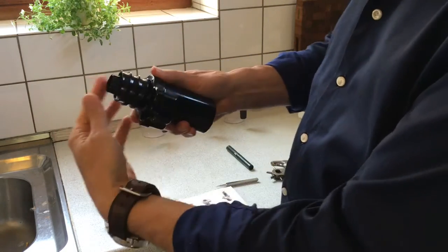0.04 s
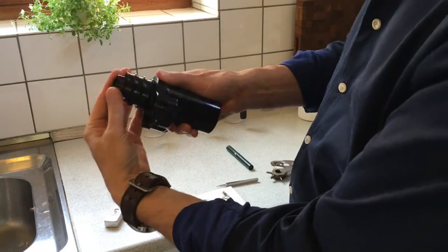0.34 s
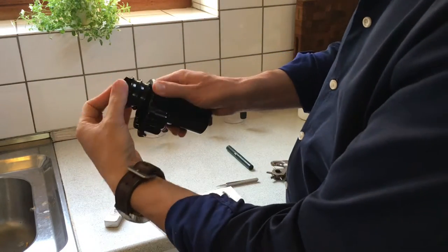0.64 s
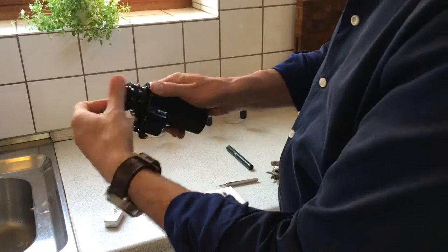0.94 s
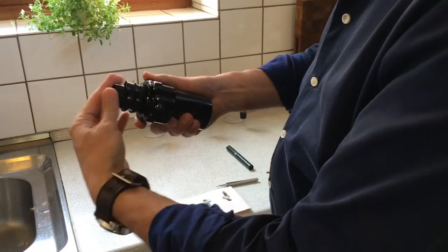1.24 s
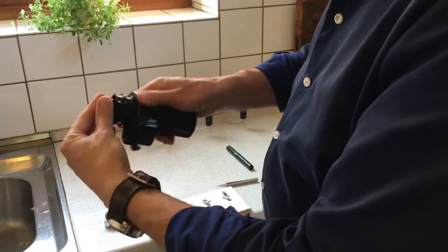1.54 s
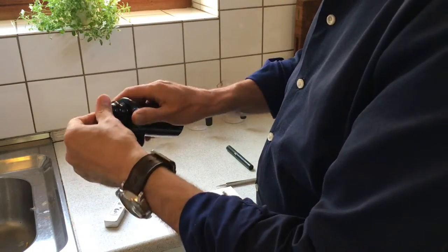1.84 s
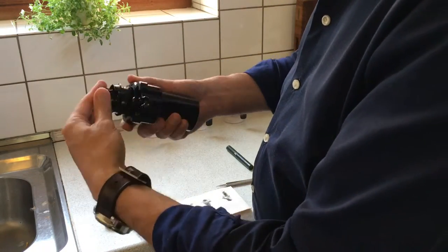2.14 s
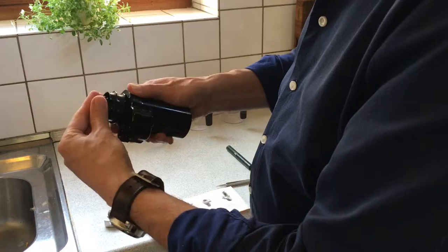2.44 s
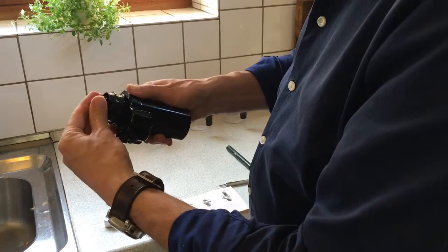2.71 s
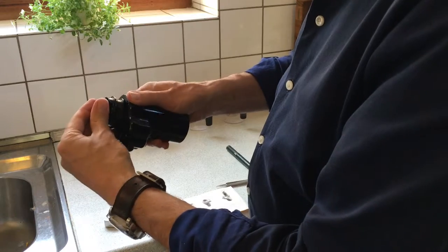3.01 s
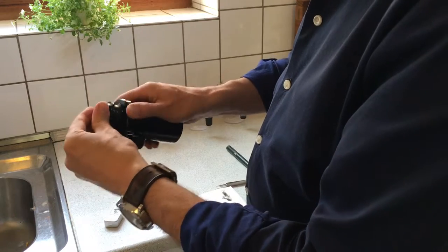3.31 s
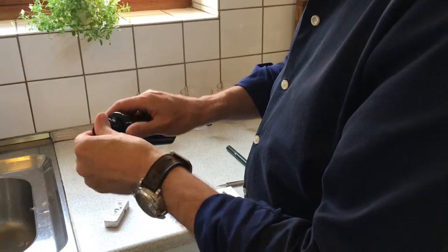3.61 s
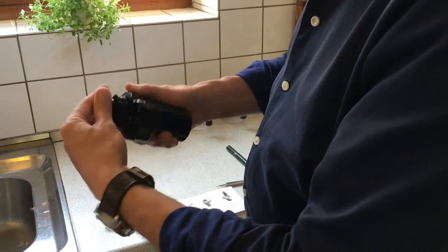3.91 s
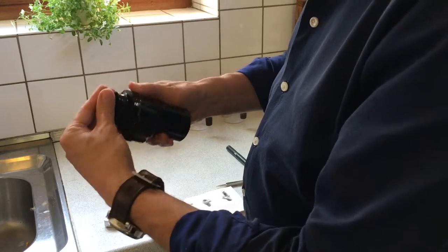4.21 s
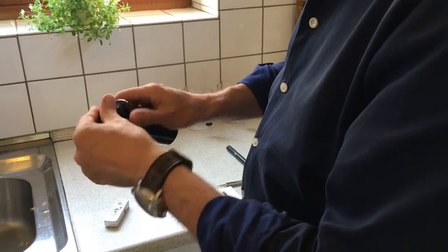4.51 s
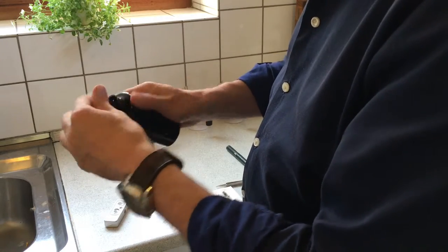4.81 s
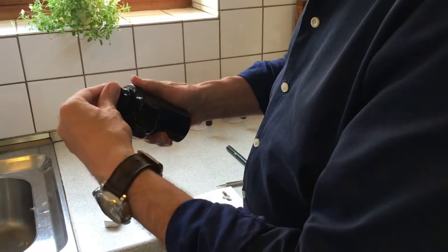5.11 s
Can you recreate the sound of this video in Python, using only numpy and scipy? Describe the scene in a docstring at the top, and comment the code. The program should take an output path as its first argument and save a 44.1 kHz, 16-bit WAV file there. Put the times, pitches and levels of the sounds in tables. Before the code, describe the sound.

Plastic tank parts rub softly as they are screwed together, with a quick run of sharp clicks in a kitchen.

```python
"""Sharp plastic clicks: a film developing tank, screwed together by hand, catches and snaps home.
Each catch is a slip and a landing; both ring the tank's modes. On each turn the threads rub, hiss
and scuff; the last tightening squeaks faintly. Hands bump the hollow tank and sleeves rustle.
A tiled kitchen reverberates, over faint mains hum and room air."""
import sys
import numpy as np
from scipy import signal
from scipy.fft import rfft, irfft, next_fast_len
from scipy.io import wavfile

SR = 44100
rng = np.random.default_rng(int(sys.argv[2]) if len(sys.argv) > 2 else 0)


def to_wav(s):
    """Save 16-bit WAV."""
    ch = np.atleast_2d(s).T  # columns
    pcm = np.round(np.clip(ch, -1, 1) * 32767)  # PCM
    wavfile.write(sys.argv[1], SR, pcm.astype(np.int16))


N = 236237
TIME_S = np.arange(N) / SR

# tank modes (frequency [Hz], width [Hz], gain struck on wall [dB], gain struck on rim [dB])
TANK_MODES = [(510, 650, -15, -14.5), (847, 200, -4.5, -3), (1206, 340, -12.5, -7),
              (1695, 1200, -14.5, -18.5), (2060, 290, -7, -10.5), (2340, 2200, -13.5, -12.5),
              (3264, 330, -4.5, -10.5), (3875, 940, 1, -6.5), (5413, 1500, -9, -8.5),
              (6740, 2100, -19, -7.5), (8480, 1800, -7.5, -1), (9370, 740, -21.5, -8),
              (12200, 3000, -18, -8), (14800, 2600, -23.5, -16.5)]
# catches (time [s], slip energy [dB], place [0 wall, 1 rim], treble tilt [dB/oct], body gain [dB],
# landing delay [s], landing energy [dB])
CATCHES = [(0.2027, -33, 0.24, -21, 4, 0.0049, -27), (0.4426, -36, .7, -11, -4.5, 0.0084, -21.5),
           (.863, -35, .1, 0, 2, .006, -42), (2.393, -20, .1, -7.5, 1, .005, -40),
           (2.5323, -11.5, .1, -4, -2.5, 0.0064, -14), (2.5404, -16, .3, 8, 2.5, .0057, -15.5),
           (2.9545, -4, .1, 0.5, -0.5, 0.004, -3), (2.963, 2, .1, 1, 0, 0.0053, -12.5),
           (3.1275, -2.5, .05, 2.5, 0, 0.0059, -1), (3.2601, -2, 0.22, 1.5, 0.5, .0043, -3.5),
           (3.3597, -4, 0.87, -2.5, 1.5, 0.0066, -4), (3.4061, 1.5, .85, -1, -1.5, .0075, -5.5),
           (3.4656, 2, 1, -.5, 0, .0058, -11.5), (3.5037, 3, 0.88, -4, -3, .006, -11.5),
           (5.0993, -35, .6, -5.5, 4.5, .006, -46)]
# thread turns (start [s], length [s], relative level [dB], release [s], base hiss pitch [Hz])
THREAD_TURNS = [(.44, .55, -59, .06, 8850), (1.463, .46, -58, 0.042, 8640), (2.39, .06, -62, .04, 11500),
                (3.602, .295, -61.5, .012, 8920), (4.287, 0.36, -68.5, .07, 9200)]
# rub spectrum (frequency [Hz], gain [dB])
RUB_SPECTRUM = [(300, -14), (700, -13), (1150, -1.5), (1690, -14.5), (1950, -7), (2700, -6), (3760, -0.5),
                (5200, -6.5), (7000, -9.5), (7900, -9.5), (9070, -4), (10400, -8), (11600, -4.5),
                (15500, -14)]
# resonances rung by rubbing (frequency [Hz], width [Hz], gain [dB])
RUB_MODES = [(1950, 310, 5), (3420, 570, -2.5), (4260, 460, -1), (9400, 980, -9), (11750, 1000, -9)]
# plastic drags (centre time [s], relative level [dB], resonance [Hz])
SCUFF_DRAGS = [(0.466, -60, 3300), (.487, -55.5, 590), (.745, -62.5, 1960), (0.764, -62, 4200),
               (.88, -60.5, 3800), (1.654, -76, 3800), (1.771, -64, 1970), (4.441, -71, 3460),
               (4.558, -66, 3300), (4.654, -56.5, 4300), (4.779, -63, 960)]
# hand bumps (time [s], envelope peak [dB], frequency [Hz])
HAND_BUMPS = [(.474, -48.5, 118), (.477, -42.5, 325), (.486, -50, 563), (0.5, -50, 168),
              (0.537, -49.5, 111), (3.701, -50, 91), (3.705, -48.5, 313), (3.766, -49, 130),
              (5.103, -44.5, 546)]
# knocks ringing the air in the tank (time [s], envelope peak [dB])
CAVITY_KNOCKS = [(5.101, -41), (5.147, -48.5)]
# arm movements (start [s], length [s], relative level [dB])
SLEEVE_STROKES = [(3.76, 0.5, -65), (4.27, 0.46, -63), (4.825, 0.084, -61), (5.074, .28, -62)]
# cloth spectrum (frequency [Hz], gain [dB])
CLOTH_SPECTRUM = [(200, -13), (600, 2), (950, 11.5), (1500, -3), (2200, 2.5), (3200, -8), (8000, -24),
                  (16000, -37)]
# kitchen reverb (frequency [Hz], gain [dB], T60 [s])
REVERB_BANDS = [(149, 3.5, .55), (500, 2.5, 0.3), (897, 0, 0.49), (1900, 5.5, 0.4), (2910, 1, .4),
                (4010, -2, .39), (5200, 0, .38), (6940, 4, 0.38), (8800, -5, .35), (10500, -3, 0.29),
                (15500, -7, .24)]
# echoes off hand, worktop and tiles (delay [s], gain [dB])
EARLY_ECHOES = [(.0028, -18), (.0062, -14.5), (.0165, -36.5)]
# mains harmonics (frequency [Hz], rms level [dB])
HUM_PARTIALS = [(48.4, -71), (193.8, -76.5), (242.2, -74.5), (290.7, -70.5), (339.1, -75), (532.9, -74.5),
                (678.3, -84)]
# room air spectrum (frequency [Hz], gain [dB])
AIR_SPECTRUM = [(12, -52), (25, -28.5), (38, -11), (53, -9), (80, -4), (120, -8), (290, -7.5), (400, -12),
                (540, -13), (1000, -12.5), (1600, -17.5), (3200, -26), (8000, -32), (15500, -36)]


def clicks(crack_s=0.00099, size=2048):
    """Each contact is a sharp push on the tank's modes. Returns (direct sound, room feed)."""
    direct, room_feed, t = np.zeros(N), np.zeros(N), np.arange(size) / SR
    hz, width_hz, wall_db, rim_db = np.transpose(TANK_MODES)
    push = signal.unit_impulse(size)
    treble_oct = np.log2(np.maximum(hz / 3300, 1))
    for time_s, energy_db, place, treble_db_per_oct, body_db in contacts():
        mode_db = wall_db + np.clip(place, 0, 1) * (rim_db - wall_db)
        # a hard edge feeds the high modes, a heavy knock the body
        mode_db = mode_db + treble_db_per_oct * treble_oct + body_db * (hz < 3000)
        gripped_hz = hz * (1 + .03 * rng.standard_normal(len(hz)))
        crack = rng.standard_normal(size) * t * np.exp(-2 * t / crack_s)
        crack /= np.linalg.norm(crack)
        # ragged from one side, smooth summed over all directions
        for out, force in (direct, push + crack), (room_feed, push):
            ring = resonate(force, zip(gripped_hz, width_hz, mode_db))
            add(out, time_s, undb(energy_db) * ring / np.linalg.norm(ring))
    return direct, room_feed


def contacts():
    """A catch slips, then lands nearer the wall with more treble and body."""
    for time_s, slip_db, place, treble_db_per_oct, body_db, delay_s, landing_db in CATCHES:
        yield time_s, slip_db, place, treble_db_per_oct, body_db
        yield time_s + delay_s, landing_db, place * .74, treble_db_per_oct + 1.5, body_db + 4


def threads(rub_db=-5, hiss_db=-12, hiss_width_hz=900, grain_db=9, slips_per_s=7000, swell_db=3):
    """Dense micro-slips ring the plastic, each mode swelling on its own; a narrow hiss rides on top."""
    slipping = rng.random(N) < slips_per_s / SR
    slips = slipping * rng.standard_normal(N) * undb(grain_db * rng.random(N))
    rings = sum(resonate(rng.permutation(slips), [mode]) * undb(swell_db * walk(14))
                for mode in RUB_MODES)
    rub = unit(colour(slips + rings, RUB_SPECTRUM))
    effort, hiss_hz = wrist()
    lowpass = signal.butter(2, hiss_width_hz / 2, fs=SR, output="sos")
    baseband = signal.sosfilt(lowpass, rng.standard_normal(N))
    hiss = unit(baseband * np.sin(2 * np.pi * np.cumsum(hiss_hz) / SR))
    return effort * undb(walk(45)) * (undb(rub_db) * rub + undb(hiss_db) * hiss)


def wrist(fastest_share=.43, spread_share=.15, lift_db=2, lift_hz=450):
    """Rub gain and hiss pitch rise with turn speed; bright scuffs press harder."""
    effort, hiss_hz = np.zeros(N), np.zeros(N)
    for start_s, length_s, db, release_s, base_hz in THREAD_TURNS:
        progress = (TIME_S - start_s) / length_s
        speed = bell(progress - fastest_share, spread_share)
        effort += stroke(start_s, length_s, .019, release_s) * undb(db + lift_db * speed)
        hiss_hz = np.where(TIME_S >= start_s, base_hz + lift_hz * speed, hiss_hz)
    for time_s, db, hz in SCUFF_DRAGS:
        if hz > 1500:
            effort += undb(db - 5.5) * bell(TIME_S - time_s, .02)
    return effort, hiss_hz


def scuffs(gain_db=-2, spread_s=.02, width_hz=880):
    """A brief drag swells and fades in one resonance of the plastic."""
    out, t = np.zeros(N), np.arange(-SR // 8, SR // 8) / SR
    for time_s, db, hz in SCUFF_DRAGS:
        drag = unit(resonate(rng.standard_normal(len(t)), [(hz, width_hz, 0)]))
        add(out, time_s + t[0], undb(db + gain_db) * bell(t, spread_s) * drag)
    return out


def squeak(start_s=5.185, length_s=.12, fade_s=.032, start_hz=7280, rise_hz_per_s=12500, level_db=-79.5):
    """The tightening thread whistles upward, unsteady, with a weaker partial a fifth above."""
    elapsed_s = np.clip(TIME_S - start_s, 0, length_s + fade_s)
    pitch_hz = (start_hz + rise_hz_per_s * elapsed_s) * (1 + .006 * walk(400))
    phase = 2 * np.pi * np.cumsum(pitch_hz) / SR
    tone = np.sin(phase) + undb(-6) * np.sin(1.5 * phase)
    return stroke(start_s, length_s, fade_s, fade_s) * undb(level_db + 3 * walk(90)) * tone


def bumps(swell_cycles=.83, cavity_hz=900, cavity_swell_s=.0064):
    """A soft hand contact swells and fades in one low resonance; knocks ring the air in the tank."""
    out, t = np.zeros(N), np.arange(SR // 4) / SR
    soft = [(time_s, db, hz, swell_cycles / hz) for time_s, db, hz in HAND_BUMPS]
    hollow = [(time_s, db, cavity_hz, cavity_swell_s) for time_s, db in CAVITY_KNOCKS]
    for time_s, db, hz, swell_s in soft + hollow:
        envelope = t / swell_s * np.exp(1 - t / swell_s)
        add(out, time_s, undb(db) * envelope * np.sin(2 * np.pi * hz * t))
    return out


def sleeves(gain_db=-7, flutter_db=3):
    """Cloth brushes unevenly as the arms turn."""
    motion = sum(undb(db) * stroke(start_s, length_s, attack_s=.027, release_s=.08)
                 for start_s, length_s, db in SLEEVE_STROKES)
    envelope = motion * undb(gain_db + flutter_db * walk(35))
    return envelope * unit(colour(rng.standard_normal(N), CLOTH_SPECTRUM))


def kitchen(x, sway_hz=1.4):
    """The tank sways in the hands, crossfading two reflection patterns."""
    angle = 2 * np.pi * sway_hz * TIME_S
    shares = np.cos(angle), np.sin(angle)
    return sum(signal.fftconvolve(x * share, room_response())[:N] for share in shares)


def room_response(build_s=.001, length_s=.7):
    """Near surfaces echo at once; the tiled room rings on, longest in the bass."""
    hz, db, t60_s = np.transpose(REVERB_BANDS)
    t = TIME_S[:int(SR * length_s)]
    log_f = np.log(bins(len(t)))
    spectrum = rfft(rng.standard_normal(len(t))) * undb(np.interp(log_f, np.log(hz), db))
    response = np.zeros(len(t))
    for share, band_t60_s in zip(np.eye(len(hz)), t60_s):
        band = irfft(spectrum * np.interp(log_f, np.log(hz), share), len(t))
        envelope = np.exp(-np.log(1000) * t / band_t60_s) * (1 - bell(t, build_s))
        response += band * envelope / np.linalg.norm(envelope)
    for delay_s, echo_db in EARLY_ECHOES:
        response[int(delay_s * SR)] += undb(echo_db) * rng.choice([-1, 1])
    return response


def mains_hum(waver_db=2.5, drift_rad=.25):
    """An appliance hums on mains harmonics, each wavering in level and phase."""
    out = np.zeros(N)
    for hz, db in HUM_PARTIALS:
        amplitude = np.sqrt(2) * undb(db + waver_db * walk(3.6))
        phase = 2 * np.pi * hz * TIME_S + drift_rad * walk(2.2) + rng.uniform(0, 2 * np.pi)
        out += amplitude * np.sin(phase)
    return out


def room_air(level_db=-62.5):
    """Still room air: low, near-steady noise."""
    return undb(level_db + .5 * walk(8.7)) * unit(colour(rng.standard_normal(N), AIR_SPECTRUM))


def resonate(x, modes):
    """Ring steep resonances (frequency [Hz], width [Hz], gain [dB]); powers add."""
    size = 2 * next_fast_len(len(x) // 2 + 1)
    f = bins(size)
    power = sum(undb(2 * db) / (1 + ((f - hz ** 2 / f) / width_hz) ** 2) ** 2
                for hz, width_hz, db in modes)
    cepstrum = irfft(np.log(power + 1e-9), size)
    cepstrum[0] /= 2
    cepstrum[size // 2:] = 0  # minimum phase: the ring follows the push
    return irfft(rfft(x, size) * np.exp(rfft(cepstrum)), size)[:len(x)]


def colour(x, points):
    """Filter by (frequency [Hz], gain [dB]) points on a log-frequency axis."""
    hz, db = np.transpose(points)
    size = next_fast_len(len(x))
    gain = undb(np.interp(np.log(bins(size)), np.log(hz), db))
    return irfft(rfft(x, size) * gain, size)[:len(x)]


def stroke(start_s, length_s, attack_s, release_s):
    """Trapezoid gain of one movement; release follows length_s."""
    rise = np.clip((TIME_S - start_s) / attack_s, 0, 1)
    fall = np.clip(1 - (TIME_S - start_s - length_s) / release_s, 0, 1)
    return rise * fall


def bell(offset, spread):
    """Gaussian, 1/e at offset = spread."""
    return np.exp(-(offset / spread) ** 2)


def walk(rate_hz):
    """Interpolated noise, rms near 1."""
    knots = rng.standard_normal(N)
    return np.sqrt(3 / 2) * np.interp(TIME_S * rate_hz, np.arange(N), knots)


def bins(size):
    """Real FFT frequencies [Hz], floored at 1."""
    return np.maximum(np.fft.rfftfreq(size, 1 / SR), 1)


def add(out, time_s, x):
    """Mix x into out at time_s."""
    i = int(round(time_s * SR))
    out[i:i + len(x)] += x[:N - i]


def undb(db):
    """dB to gain."""
    return 10 ** (np.asarray(db) / 20)


def unit(x):
    """Scale to rms 1."""
    return x / np.sqrt(np.mean(x ** 2))


def scene(soft_send_db=-9):
    """Clicks and rubbing fill the kitchen; bumps and squeak stay close. Mono."""
    clicks_direct, clicks_room_feed = clicks()
    rubbing = threads() + scuffs() + sleeves()
    soft = bumps() + squeak()
    room = kitchen(clicks_room_feed + rubbing + undb(soft_send_db) * soft)
    return (clicks_direct + rubbing + soft + room + mains_hum() + room_air())[None]


def record(dry, cutoff_hz=15800):
    """Steep elliptic low-pass."""
    return signal.sosfilt(signal.ellip(10, .2, 75, cutoff_hz, fs=SR, output="sos"), dry)


dry = scene()
out = record(dry)
to_wav(out)
```